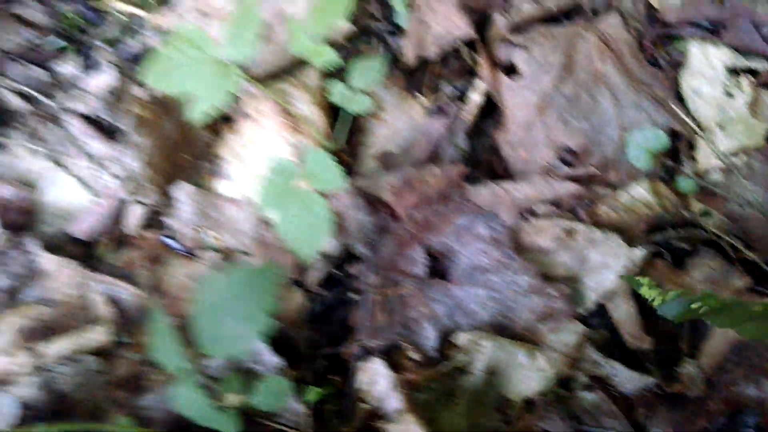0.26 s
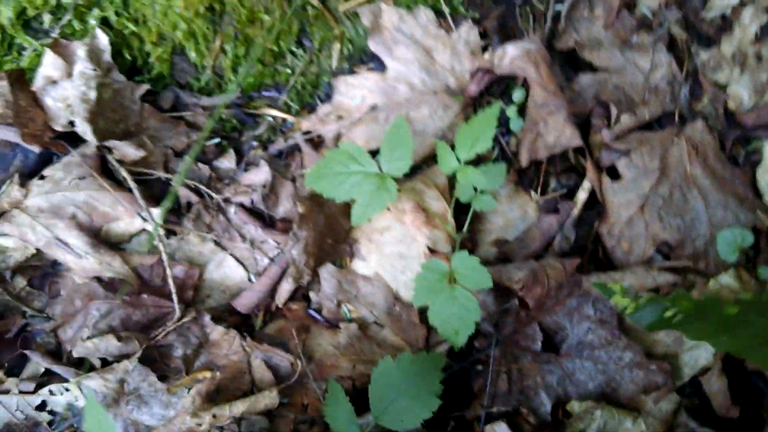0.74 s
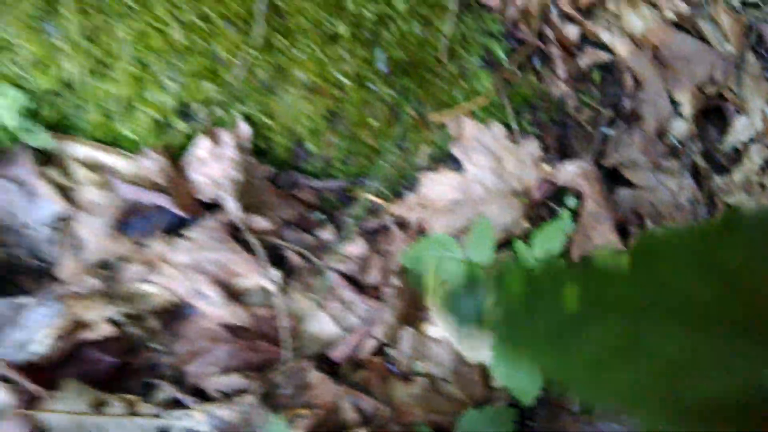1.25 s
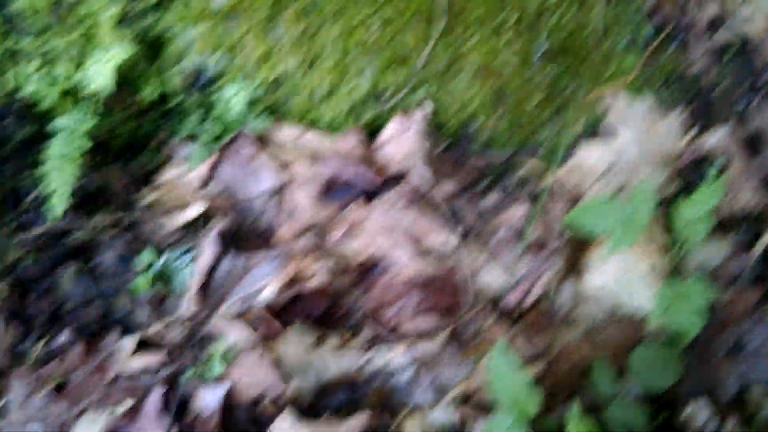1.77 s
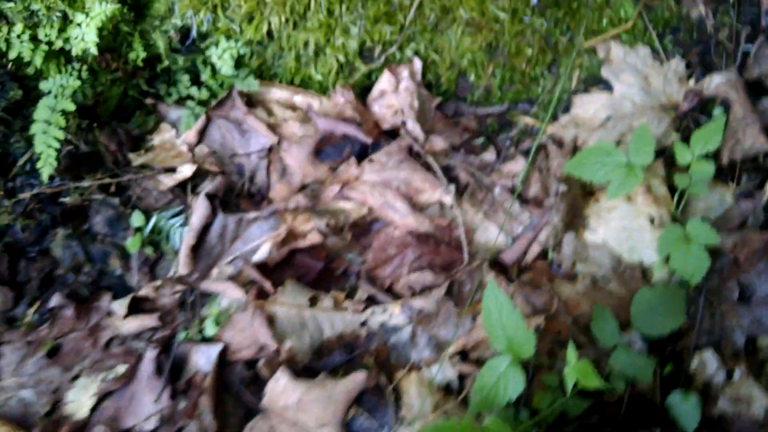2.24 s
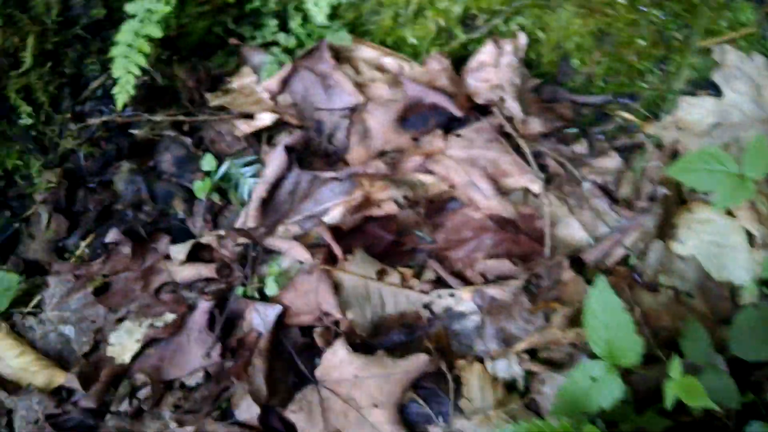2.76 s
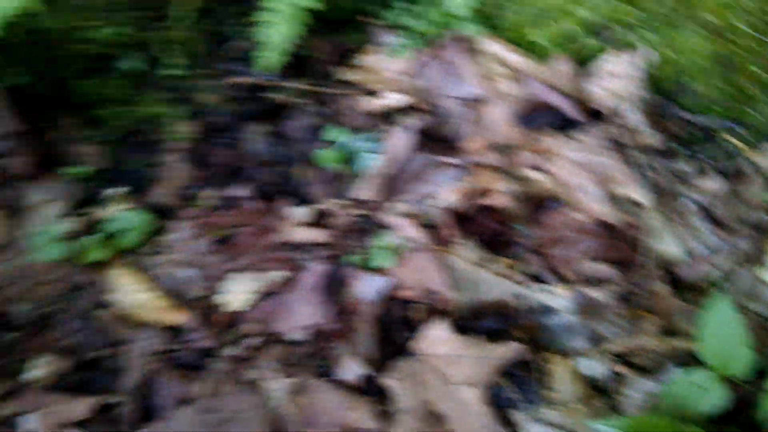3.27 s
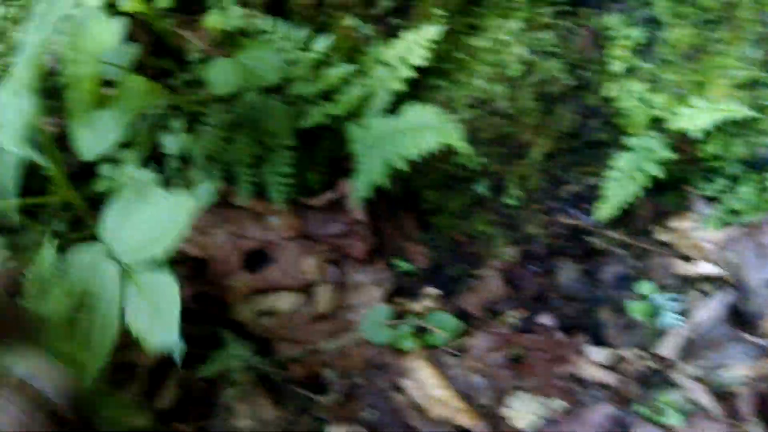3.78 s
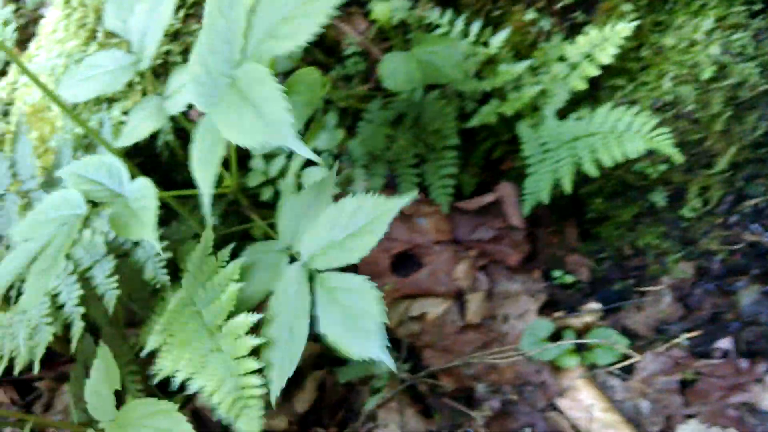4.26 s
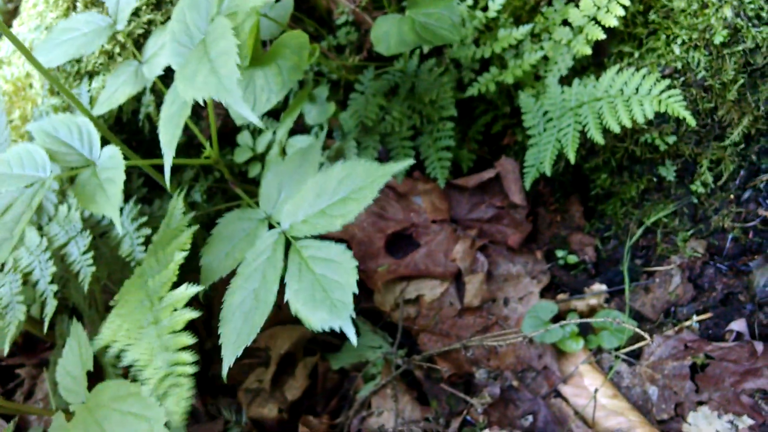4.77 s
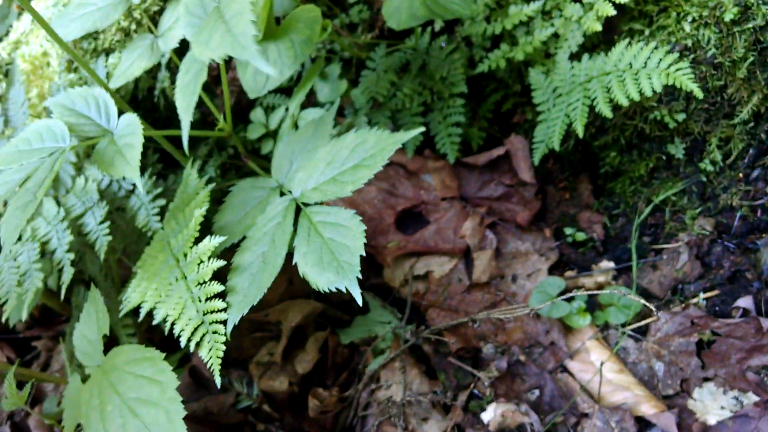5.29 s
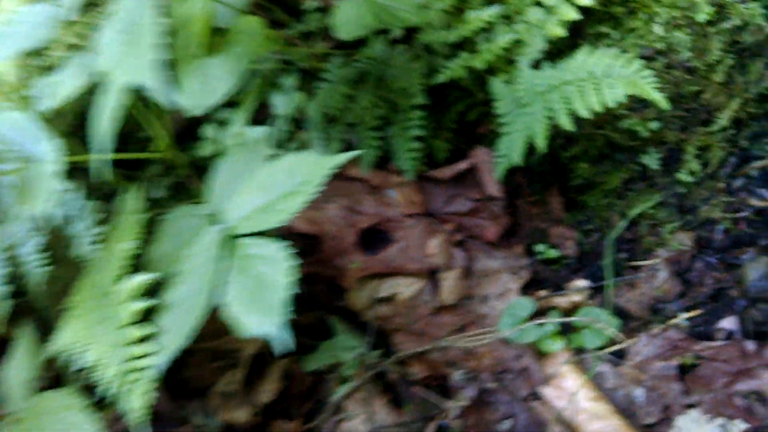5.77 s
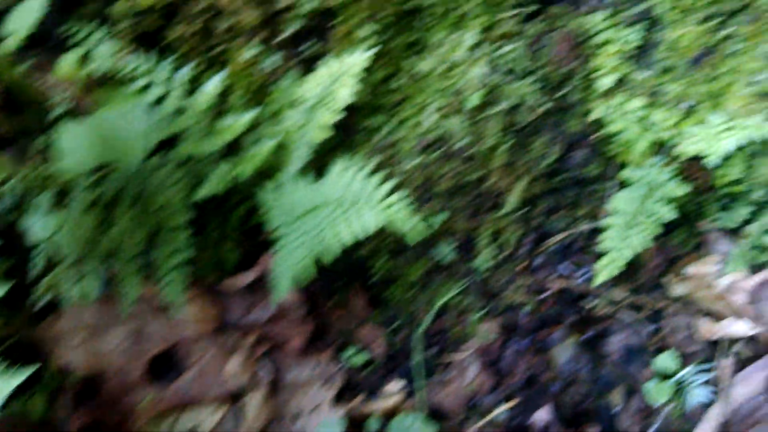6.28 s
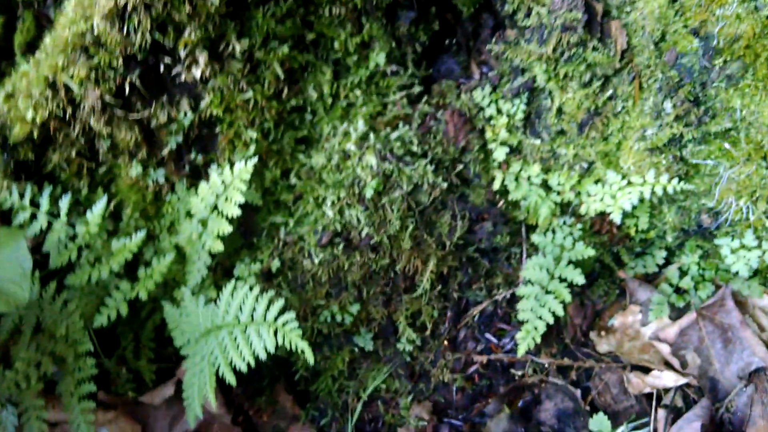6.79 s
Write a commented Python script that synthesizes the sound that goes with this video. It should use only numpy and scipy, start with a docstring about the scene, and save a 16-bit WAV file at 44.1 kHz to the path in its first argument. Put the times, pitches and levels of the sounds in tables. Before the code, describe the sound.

Dry leaves crackle, crunch and snap close by on a forest floor, then settle to stray ticks over a faint far engine hum and thin birdsong.

```python
"""Shifting through dry leaf litter

Someone shifts through leaves on a forest floor: noise-burst crackle and crunch, broadband snaps, resonant scrapes.
A plant brushes the microphone (low slips) and foot and hand knock (damped sines); later mostly stray ticks remain.
Behind: swept-sine birds with echoes, engine and rotor harmonics far beyond the trees, filtered-noise rumble and hiss."""
import sys
import numpy as np
from scipy import signal
from scipy.fft import rfft, irfft, next_fast_len
from scipy.io import wavfile

SR = 44100
rng = np.random.default_rng(int(sys.argv[2]) if len(sys.argv) > 2 else 0)


def waveform_to_disk(signal):
    """Save audio, clipped to [-1, 1], as 16-bit WAV at the path in sys.argv[1]."""
    frames = np.transpose(np.atleast_2d(signal))
    scaled = np.clip(frames, -1, 1) * 32767
    samples = np.round(scaled).astype(np.int16)
    wavfile.write(sys.argv[1], SR, samples)


N = 310023
T = np.arange(N) / SR


def from_db(db):
    """Decibels to gain."""
    return 10 ** (np.asarray(db) / 20)


def rms_one(x):
    """Scale to unit rms."""
    return x / np.sqrt(np.mean(x ** 2) + 1e-20)


def in_time(rows):
    """Columns of a time curve at every sample."""
    time_s, *columns = np.transpose(rows)
    return [np.interp(T, time_s, column) for column in columns]


def at_hz(points, hz):
    """Read a spectrum on a log-frequency axis."""
    points = np.array(points)
    return np.interp(np.log(hz), np.log(points[:, 0]), points[:, 1])


def drift(rate_hz):
    """Low-passed random wander, about unit spread, computed at SR / 40."""
    r = np.exp(-80 * np.pi * rate_hz / SR)
    noise = rng.standard_normal(N // 40 + 2002)
    slow = signal.lfilter([1], [1, -2 * r, r * r], noise)[2000:]  # drop the settling
    return np.interp(np.arange(N) / 40, np.arange(len(slow)), rms_one(slow))


def band(x, low_hz, high_hz):
    """Gentle causal band-pass."""
    sos = signal.butter(2, [low_hz, min(high_hz, .48 * SR)], "band", fs=SR, output="sos")
    return signal.sosfilt(sos, x + 1e-18)


def bands(spectrum, count):
    """(low Hz, high Hz, gain) of log-spaced bands spanning a spectrum."""
    edges = np.geomspace(spectrum[0][0], spectrum[-1][0], count + 1)
    return [(low, high, from_db(at_hz(spectrum, np.sqrt(low * high)))) for low, high in zip(edges, edges[1:])]


def pan(left_over_right_db):
    """Left and right gains of constant total power."""
    return rms_one(from_db(np.array([[left_over_right_db], [-left_over_right_db]]) / 2))


def delay(x, seconds):
    """Delay by any fraction of a sample, as a phase slope."""
    size = next_fast_len(N + SR // 8)
    hz = np.fft.rfftfreq(size, 1 / SR)
    return irfft(rfft(x, size) * np.exp(-2j * np.pi * hz * seconds), size)[..., :N]


def add(out, sound, s):
    """Mix in a stereo sound centred on a given time."""
    at = round(s * SR) - sound.shape[1] // 2
    first, last = max(at, 0), min(at + sound.shape[1], N)
    out[:, first:last] += sound[:, first - at:last - at]


# forest air: (frequency [Hz], relative density [dB per Hz])
FOREST_SPECTRUM = [(25, -3), (60, -0.5), (120, 0.5), (250, -4), (450, -8), (700, -18.5), (1050, -21),
                   (1500, -29.5), (3000, -31.5), (6500, -37.5), (10000, -33), (15500, -36)]
# how well far sound carries: (time [s], gain [dB]); the rumble takes half the dB, the hum all
CARRYING = [(0, -5), (1, -3.5), (2.3, -2.5), (3.4, -1), (4.5, -0.5), (6, 2)]


def forest():
    """Far rumble and thin canopy hiss: drifting noise bands, split around 800 Hz into (rumble, hiss)."""
    white = rng.standard_normal((2, 2, N))
    rumble, hiss = 0, 0
    for k, (low, high, gain) in enumerate(bands(FOREST_SPECTRUM, count=20)):
        air = gain * band(white[k % 2], low, high) * from_db(1.0 * drift(5.1))
        far_share = 1 / (1 + (low / 800) ** 2)
        rumble = rumble + np.sqrt(far_share) * air
        hiss = hiss + np.sqrt(1 - far_share) * air
    carrying = from_db(.5 * in_time(CARRYING)[0])
    return from_db(-27.0) * rumble * carrying, from_db(-20.0) * hiss


# speed of the far engine and of the rotor it drives: (time [s], rate [turns/s])
ENGINE_SPEED = [(0, 29.5), (3.4, 29), (5, 29.5), (6, 29.5), (7, 29)]
ROTOR_SPEED = [(0, 102.6), (4.5, 102.8), (6, 102.5), (7, 101.1)]
# their harmonics: (multiple of the turn rate, relative level [dB])
ENGINE_HARMONICS = [(1, -63), (2, -48), (3, -54.5), (4, -44), (5, -47), (6, -55), (7, -62), (8, -58.5),
                    (9, -54), (12, -53), (14, -61.5), (16, -64.5), (24, -66.5)]
ROTOR_HARMONICS = [(1, -49), (2, -55.5), (3, -48.5), (4, -56), (5, -55.5), (6, -63), (7, -68.5), (8, -65.5)]


def hum():
    """Engine and rotor harmonics swell and fade separately on their long way through the trees."""
    out = np.zeros(N)
    for track, lines in ((ENGINE_SPEED, ENGINE_HARMONICS), (ROTOR_SPEED, ROTOR_HARMONICS)):
        speed, = in_time(track)
        turns = np.cumsum(speed * (1 + 0.00212 * drift(3.31))) / SR
        for multiple, db in lines:
            amplitude = np.sqrt(2) * from_db(db - 2.5 + drift(2.0))
            out += amplitude * np.sin(2 * np.pi * (round(multiple) * turns + rng.random()))
    return out * from_db(in_time(CARRYING)[0])


# far birds: (start [s], length [s], start pitch [Hz], end pitch [Hz], upward arch [Hz],
#             relative level [dB], hoarseness [share of pitch])
BIRD_NOTES = [(4.183, .06, 3800, 3740, 3, -63, .008), (4.245, .17, 3450, 3410, -2, -64.5, .008),
              (4.32, .11, 3230, 3230, -2, -68, .006), (4.35, 0.29, 3630, 3520, 1, -65, .01),
              (4.66, .12, 5000, 4950, 0, -64, .004), (4.88, 0.066, 9100, 10150, 0, -59, .002),
              (4.955, 0.065, 9500, 10200, 0, -64, .002), (5.107, 0.059, 11100, 10400, 100, -61, .006),
              (5.45, 0.13, 5600, 4500, 80, -65, .006), (5.782, 0.52, 11000, 11500, -0.5, -64, 0.058),
              (6.15, 0.1, 4470, 4450, 0, -64, .007), (6.23, 0.13, 4480, 4500, 0, -64.5, .007),
              (6.3, 0.19, 11000, 10900, 0, -62, .02), (6.33, .13, 11800, 11900, 0, -61, .015),
              (6.435, 0.055, 4490, 4510, -3, -61, 0.0055), (6.525, 0.05, 4520, 4450, 0, -61, .006),
              (6.608, 0.046, 4510, 4440, 0, -60, .006), (6.68, .04, 4460, 4460, 0, -64, .006),
              (6.678, 0.06, 9400, 9350, 0, -60, .04), (6.73, 0.19, 3754, 4040, 91, -62, .014),
              (6.87, 0.11, 2760, 2660, -40, -65, .025), (6.88, .19, 2220, 2440, 0, -64, .016),
              (6.87, .2, 5330, 5540, 2, -64, .025)]


def birds(flutter_db=2.0, woods_db=2.0, woods_t60_s=0.41, lag_s=0.0001):
    """Thin arching whistles and hoarse high calls flutter with distance and linger among the trunks."""
    song, rasp = np.zeros(N), drift(390)
    for s, length, start_hz, end_hz, arch_hz, db, hoarse in BIRD_NOTES:
        note = slice(int(s * SR), int((s + length) * SR))
        along = (T[note] - s) / length
        arch = np.abs(np.sin(np.pi * along))
        hz = start_hz + (end_hz - start_hz) * along + arch_hz * arch
        hz = hz * (1 + hoarse * rasp[note])
        song[note] += from_db(db) * np.sqrt(arch) * np.sin(2 * np.pi * np.cumsum(hz) / SR)
    song = song * from_db(flutter_db * drift(28))
    t = np.arange(SR // 2) / SR
    tail = rng.standard_normal((2, len(t))) * from_db(-60 * t / woods_t60_s)
    echoes = rms_one(tail) / np.sqrt(len(t))  # unit energy
    direct = np.array([song, delay(song, lag_s)]) * pan(1.9)
    reverb = from_db(woods_db) * signal.fftconvolve(song[None], echoes, axes=1)[:, :N]
    return from_db(3.0) * (direct + reverb)


def stroke(s, length, db, release=0.94):
    """Power of one movement, swelling to a peak and letting go; length is about its half-power width."""
    power = np.zeros(N)
    near = slice(*np.searchsorted(T, [s - 2 * length, s + 2 * length]))
    along = (T[near] - s) / (length / 2) / np.where(T[near] < s, 1, release)
    power[near] = from_db(db) ** 2 * .5 ** (along ** 2)
    return power


def fractures(spectrum, per_s, spread_db, burst_s, bed, clicks_per_s, tint_db, count):
    """Leaves give way at random, each a burst of tiny clicks in its own colour, over steady friction; rms 1."""
    out = np.zeros((2, N))
    events = int(per_s * N / SR)
    chance = rng.random((events, 3))
    at, side = (chance[:, 0] * N).astype(int), (2 * chance[:, 1]).astype(int)
    size_db = spread_db * np.minimum(-np.log(1 - chance[:, 2]), 3)
    fade = np.exp(-1 / (burst_s * SR))
    for low, high, gain in bands(spectrum, count=count):
        kicks = np.zeros((2, N))
        np.add.at(kicks, (side, at), from_db(size_db + tint_db * rng.uniform(-2.1, 2.1, events)))
        # double pole: a tear gathers speed, then runs out
        bursts = rms_one(signal.lfilter([1], [1, -2 * fade, fade ** 2], kicks + 1e-18))
        draw = rng.random((2, N), dtype=np.float32) - .5
        clicks = np.sign(draw) * (np.abs(draw) < clicks_per_s / SR / 2)
        out += gain * band(clicks * (bed + bursts), low, high)
    return rms_one(out)


# plant strokes over the microphone housing: (peak time [s], length [s], relative level [dB])
BRUSH_STROKES = [(0.63, 0.018, -31.5), (0.812, 0.036, -28.5), (0.924, 0.079, -25), (1.014, 0.065, -23.5),
                 (1.145, 0.028, -24.5), (1.195, 0.05, -22), (1.358, 0.036, -22.5), (1.487, .11, -21.5),
                 (1.6, 0.058, -20.5), (1.784, 0.091, -29.5), (1.979, 0.019, -27)]
# rubbing: (frequency [Hz], relative density [dB per Hz])
RUB_SPECTRUM = [(40, -8), (90, 4.5), (170, 2.5), (270, 0.5), (400, -11), (600, -10), (950, -18),
                (2000, -29)]
# light lean between strokes, level on the strokes' scale
LEAN_S, LEAN_LENGTH_S, LEAN_DB = 1.11, 0.97, -33.5


def brush():
    """A leaf drags over the housing in small dull slips, on the right."""
    rubbing = stroke(LEAN_S, LEAN_LENGTH_S, LEAN_DB)
    rubbing = rubbing + sum(stroke(s, length, db) for s, length, db in BRUSH_STROKES)
    slips = fractures(RUB_SPECTRUM, per_s=140, spread_db=2.0, burst_s=0.0015, bed=1.0,
                      clicks_per_s=3000, tint_db=-0.5, count=7)
    return slips * np.sqrt(rubbing) * from_db(-0.53) * pan(-10.0)


# dull blows of foot and hand: (time [s], relative level [dB], pitch [Hz], scuff against swing [dB])
KNOCK_BLOWS = [(0.089, -23.5, 343, 13), (1.016, -17, 260, 0), (1.200, -17, 115, -2), (1.604, -21, 134, 0),
               (1.971, -32, 150, 24), (2.539, -28.5, 402, -1), (3.019, -28, 170, 5), (3.719, -17, 169, -9),
               (3.738, -24.5, 403, -2), (4.186, -27.5, 128, 13.5), (4.217, -25.5, 216, 7),
               (4.251, -28.5, 141, 13)]


def knocks():
    """Soft blows, equal on both sides: a quickly damped two-mode swing with a short noise scuff."""
    out, t = np.zeros(N), np.arange(SR // 8) / SR
    for s, db, hz, scuff_db in KNOCK_BLOWS:
        modes = np.sin(2 * np.pi * hz * t) + .5 * np.sin(2 * np.pi * hz * 2.1 * t)
        swing = modes * from_db(-60 * t / 0.061)
        scuff = band(rng.standard_normal(len(t)), 400, 1000) * from_db(scuff_db - 60 * t / 0.031)
        at = round(s * SR)
        out[at:at + len(t)] += from_db(db - 5.5) * (swing + scuff)
    return out


# thin dry leaves, for ticks and litter: (frequency [Hz], relative density [dB per Hz])
CRACKLE_SPECTRUM = [(700, -16), (1500, -16), (2600, -9.5), (4000, -1), (6000, -2.5), (8000, -0.5),
                    (11000, -0.5), (15500, -3)]


def ticks():
    """Bent leaves keep springing back in tiny, sparse ticks."""
    springs = fractures(CRACKLE_SPECTRUM, per_s=18, spread_db=0.0, burst_s=0.00072, bed=.02,
                        clicks_per_s=18000, tint_db=3.5, count=5)
    return from_db(-65.0) * springs * pan(0.0)


SLIPS_PER_S = 1400


def scrape(length, hz, width_hz, rise_octaves):
    """Stick-slip noise rings one leaf whose resonance glides as it bends; swells mid-way over three lengths."""
    along = np.linspace(-3, 3, int(3 * length * SR))
    slips = rng.standard_normal(len(along)) * (0.12 + (rng.random(len(along)) < SLIPS_PER_S / SR))
    turn = np.exp(2j * np.pi * np.cumsum(hz * 2 ** (rise_octaves * along / 2)) / SR)
    fade = np.exp(-np.pi * width_hz / SR)
    # shift down to 0 Hz, low-pass, shift back: a gliding resonance
    ringing = (turn * signal.lfilter([1], [1, -2 * fade, fade ** 2], slips / turn)).real
    return rms_one(ringing) * .5 ** (along ** 2)


CRINKLES_PER_S, CRINKLE_S = 130, .005  # length varies from half to double
CRINKLE_DB = -7.5  # against the crackle curve
# dry leaves ring high and only briefly
CRINKLE_LOW_HZ, CRINKLE_HIGH_HZ, CRINKLE_WIDTH_HZ = 3530, 14300, 1900


def crinkles(spread_db=3.0, glide_octaves=0.17, scatter_db=19.5):
    """Many leaves of all sizes scrape briefly, each at its own pitch and place; rms 1."""
    out = np.zeros((2, N))
    for when, size, lasting, strength, bend, place in rng.random((int(CRINKLES_PER_S * N / SR), 6)):
        hz = CRINKLE_LOW_HZ + (CRINKLE_HIGH_HZ - CRINKLE_LOW_HZ) * size
        length_s = CRINKLE_S * 2 ** (2 * lasting - 1)
        sound = scrape(length_s, hz, CRINKLE_WIDTH_HZ, glide_octaves * (2 * bend - 1))
        placed = sound * pan(scatter_db * (4 * place - 2))
        add(out, from_db(2 * spread_db * strength) * placed, when * N / SR)
    return rms_one(out)


# single leaves scraping past each other, damp ones lower:
# (peak time [s], length [s], relative level [dB], resonance [Hz], rise [octaves])
LEAF_SCRAPES = [(0.347, 0.024, -34, 7000, 0), (1.786, 0.089, -30, 13000, .05), (1.928, .05, -47, 11900, 0),
                (2.028, 0.078, -44, 8100, -.03), (2.3, .12, -46, 8000, 0), (2.548, 0.0085, -22.5, 14200, 0),
                (2.648, .025, -33.5, 9000, 0), (2.87, .04, -40, 3160, .1), (2.94, .06, -39.5, 3750, .1),
                (3.69, .03, -49, 3200, 0), (3.758, .05, -52, 3250, 0.12), (3.767, 0.14, -48.5, 1450, .05),
                (3.75, .05, -48.5, 2150, 0), (3.928, 0.033, -54, 2450, -.25)]
SCRAPE_WIDTH_SHARE = .17  # resonance width / pitch


def scrapes():
    """Single leaf scrapes that stand out of the rustle, on the right."""
    out = np.zeros((2, N))
    for s, length, db, hz, rise in LEAF_SCRAPES:
        sound = scrape(length, hz, SCRAPE_WIDTH_SHARE * hz, rise)
        add(out, from_db(db - 3.5) * sound * pan(-14.0), s)
    return out


# weight resting on the litter: (time [s], relative crackle level [dB])
RESTING_WEIGHT = [(0, -44), (.06, -46), (.14, -37), (.6, -39.5), (.76, -45.5), (.95, -36), (1.7, -38.5),
                  (2.18, -43), (2.42, -52), (2.72, -40.5), (3.0, -41.5), (3.36, -46), (3.95, -46.5),
                  (4.12, -54), (4.4, -53), (4.7, -76), (5.2, -95)]
# pushes into the litter: (peak time [s], length [s], relative crackle level [dB], sliding treble [dB])
LITTER_PUSHES = [(0.115, 0.03, -37.5, -6), (0.274, 0.054, -32.5, 1), (0.423, 0.049, -33.5, -2),
                 (0.549, 0.056, -35.5, -1), (0.628, 0.016, -33, 5), (0.698, 0.031, -29, -3),
                 (0.85, 0.084, -27.5, 0), (0.985, 0.082, -36, -3), (1.201, 0.076, -29, -4),
                 (1.362, 0.026, -30, -7), (1.458, 0.091, -33, -3), (1.63, 0.06, -33.5, 4),
                 (1.776, 0.12, -32.5, 5.5), (1.92, 0.015, -44.5, 21), (2.03, 0.12, -38.5, 4.5),
                 (2.32, 0.13, -41, 4.5), (2.598, 0.17, -34.5, 2.5), (2.892, 0.17, -35.5, 0.5),
                 (3.02, 0.016, -36, -1), (3.099, 0.024, -33.5, 0), (3.172, 0.03, -43.5, 11.5),
                 (3.263, 0.064, -55, 18), (3.742, 0.097, -46, -2), (6.92, 0.13, -55, -7)]
RESTING_SLIDE_DB = 1  # sliding treble between pushes


def pressure():
    """Powers of resting weight and pushes add up: (crackle dB, treble gain from sliding)."""
    resting = from_db(in_time(RESTING_WEIGHT)[0]) ** 2
    power, treble = resting, resting * from_db(RESTING_SLIDE_DB)
    for s, length, db, slide_db in LITTER_PUSHES:
        push = stroke(s, length, db)
        power, treble = power + push, treble + push * from_db(slide_db)
    return 10 * np.log10(power), treble / power


# packed lower layer: (frequency [Hz], relative density [dB per Hz])
CRUNCH_SPECTRUM = [(120, 11.5), (300, 7.5), (600, 5), (1100, -0.5), (2000, -5.5), (4000, -8.5)]
# crunch is CRUNCH_DB under a crackle of FIRM_DB; it follows a share of the dB swing and yields later
FIRM_DB, CRUNCH_DB, CRUNCH_FOLLOWS, CRUNCH_LAG_S = -36, -40.5, 0.89, 0.0043


def litter(crackle_db, sliding):
    """Thin dry leaves crackle on top, brighter when sliding; the packed layer beneath crunches lower."""
    late_db = np.interp(T - CRUNCH_LAG_S, T, crackle_db)
    crunch_db = CRUNCH_DB + CRUNCH_FOLLOWS * (late_db - FIRM_DB)
    crackle = fractures(CRACKLE_SPECTRUM, per_s=600, spread_db=1.5, burst_s=0.00053, bed=1.0,
                        clicks_per_s=6500, tint_db=8.0, count=12)
    crunch = fractures(CRUNCH_SPECTRUM, per_s=260, spread_db=3.5, burst_s=0.0014, bed=1.0,
                       clicks_per_s=2200, tint_db=3.5, count=8)
    crackle = crackle + (sliding - 1) * band(crackle, 5400, SR / 2)
    top = crackle * from_db(crackle_db - 1.4) * pan(-2.7)
    return top + crunch * from_db(crunch_db) * pan(-18.0)


# leaves and stalks that break, and near 4.17-4.25 s the sharp dull scuffs of the knocks there: # (time [s],
# relative level [dB], tear time [s], low middle against 4 kHz [dB], treble against 4 kHz [dB])
LEAF_SNAPS = [(.0882,-20,0.0007,-10,8), (.114,-24.5,0.00089,-7,-2), (.1315,-30,0.001,2,-2),
              (0.1676,-23,.0004,-2,3), (.2132,-31,.0004,-7,17), (.2372,-26.5,.0009,-6,10),
              (.263,-28,0.0022,-9,7), (0.2895,-23.5,0.00031,-3,1), (.401,-33,0.0024,5,6),
              (.6078,-27,0.00077,-5,7), (0.6277,-31,.002,7,0), (0.6869,-19,0.00038,0,2.5),
              (0.7932,-21.5,0.0015,-33,-10), (.8178,-24,0.00036,-7,7), (.870,-22.5,0.0045,-21,3),
              (.9613,-24,.0004,0,8), (0.981,-21,0.00049,-4,7), (1.0316,-24,.0004,-4,7),
              (1.129,-19,.0007,-8,9), (1.1448,-23,.0004,0,3), (1.156,-25,.0004,-4,4),
              (1.1788,-16.5,0.00091,-6,6), (1.2,-22,.0005,-7,-4), (1.212,-19,0.00079,-16,-1),
              (1.215,-20.5,.0015,-21,5), (1.3545,-26,.0008,6,4), (1.3862,-22,0.00068,5,5),
              (1.4162,-30,.0005,-2,4), (1.484,-22.5,.0005,7,4), (1.504,-18.5,.0014,-2,12),
              (1.517,-24,.0007,-7,10), (1.553,-30,.0004,20,0), (1.5965,-23.5,.0006,9,3),
              (1.7398,-26,.0005,-6,12), (1.7668,-29,0.00059,-6,18), (1.7868,-19,.0003,-4,15),
              (1.794,-22,0.00092,-8,24), (1.804,-25,.0005,3,8), (1.9036,-30,.0005,-14,15),
              (1.986,-26,.0013,-10,15), (2.0098,-26,.0003,-7,10), (2.1182,-26,0.00034,-6,10),
              (2.123,-31,.0004,-9,13), (2.4635,-35,.001,18,7), (2.478,-32,0.0011,5,10),
              (2.5,-31,.0006,2,12), (2.5465,-30,0.0009,-22,2), (2.551,-25,0.0011,-34,-10),
              (2.5555,-26,0.00037,-24,-1), (2.64,-25,0.0011,2,20), (2.7005,-24,0.00035,3,15),
              (2.8495,-25.5,0.00036,1,6), (2.857,-26,0.00076,-4,8), (2.931,-29.5,0.002,3,-3),
              (3.0203,-23,0.00068,2,-1), (3.088,-31,0.0011,-6,10), (3.094,-30.5,0.0037,-2,3),
              (3.1575,-30,0.00097,-8,5), (3.25,-33,.0007,-8,8), (3.2832,-34,0.0011,-13,4),
              (3.3263,-31,0.00056,-11,14), (4.1705,-39,.0003,20,-8), (4.187,-39,0.00069,26,-8),
              (4.251,-42.5,0.00085,20,-8), (4.328,-44,.001,4,-6), (4.3745,-42,0.00057,-9,6),
              (4.7427,-39,.0004,-5,8), (4.8473,-39,.0007,1,-8), (5.0244,-40,0.00071,-2,-2),
              (5.181,-43,.0008,6,-1), (5.249,-35.5,0.0012,6,0), (5.6908,-46,.0014,-2,13),
              (5.8243,-40.5,0.00048,-3,-3), (5.917,-37.5,0.00063,-14,3), (6.1528,-37.5,.0006,-10,0)]


def snaps(shiver=0.17, shiver_t60_s=0.1, tint_db=3.0):
    """A leaf rib cracks at once, a stalk tears more slowly, each in its own colour; the leaf shivers after."""
    out, t = np.zeros((2, N)), np.arange(SR // 20) / SR
    s, db, tear_s, low_db, treble_db = np.transpose(LEAF_SNAPS)
    along = t / np.maximum(tear_s, 1e-4)[:, None]
    shapes = along * np.exp(1 - along) + shiver * from_db(-60 * t / shiver_t60_s)
    colours = []
    for low, top in zip(low_db, treble_db):
        spectrum = [(400, low - 2), (1100, low), (4200, 0), (11000, top), (16000, top + 0.5)]
        colours.append(bands(spectrum, count=11))
    cracks = 0
    for k, (low, high, _) in enumerate(colours[0]):
        gains = np.array([colour[k][2] for colour in colours])
        gains = gains * from_db(tint_db * rng.standard_normal(len(s)))
        cracks = cracks + gains[:, None] * band(rng.standard_normal(shapes.shape) * shapes, low, high)
    for start, level_db, shape, crack in zip(s, db, shapes, cracks):
        at = round(start * SR)
        crack = rms_one(crack) * np.sqrt(np.mean(shape ** 2))
        out[:, at:at + len(t)] += (from_db(level_db - 1.0) * crack * pan(-28.0))[:, :N - at]
    return out


def undergrowth(x):
    """Trunks and ground scatter a few weak echoes, different ones to each side."""
    out = x.copy()
    for k, lag_s in enumerate(rng.uniform(.002, .05, 16)):
        d = int(lag_s * SR)
        out[k % 2, d:] += from_db(-8.0 - 373 * lag_s) * x[k // 2 % 2, :-d]
    return out


# microphone cross-feed: (frequency [Hz], share of the other side taken away)
CROSS_FEED = [(300, 0.7), (1200, 0.49), (2500, 1), (3700, 0.73), (5000, 0.41), (7700, 0.28), (10300, 0.46),
              (12800, 0.3), (15000, 0.83)]
PORT_LAG_S = 0.000393


def widen(x):
    """The stereo microphone subtracts a late copy of the other side, most fully around 2.5 kHz."""
    size = next_fast_len(N + SR // 8)
    hz, sides = np.fft.rfftfreq(size, 1 / SR), rfft(x, size)
    share = np.clip(at_hz(CROSS_FEED, np.maximum(hz, 1)), 0, 1)
    bleed = share * np.exp(-2j * np.pi * hz * PORT_LAG_S)
    return irfft(sides - bleed * sides[::-1], size)[:, :N]


def scene():
    """Leaves close, mostly right; birds near the centre; hum and rumble from the far left."""
    rumble, hiss = forest()
    far = hum() + rumble[0]
    distant = np.array([far, delay(far, 0.00014)]) * pan(5.3)
    distant = distant + 0.063 * rumble[1] * [[1], [-1]]  # opposite sign per side: width
    near = hiss * pan(-1.5) + birds() + brush()
    crackle_db, sliding = pressure()
    leaves = ticks() + crinkles() * from_db(crackle_db + CRINKLE_DB) + scrapes()
    leaves = leaves + litter(crackle_db, sliding) + snaps()
    return widen(undergrowth(leaves) + near) + knocks() + distant


CUTOFF_HZ = 15500


def record(dry):
    """Steep elliptic low-pass cuts the top."""
    return signal.sosfilt(signal.ellip(10, .1, 80, CUTOFF_HZ, fs=SR, output="sos"), dry)


dry = scene()
out = record(dry)
waveform_to_disk(out)
```